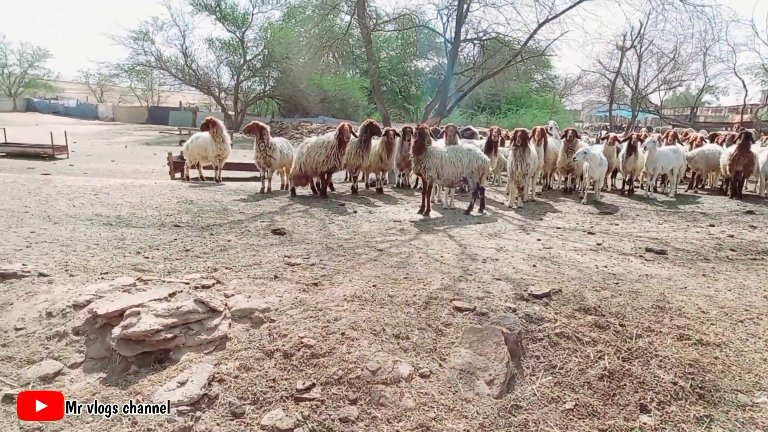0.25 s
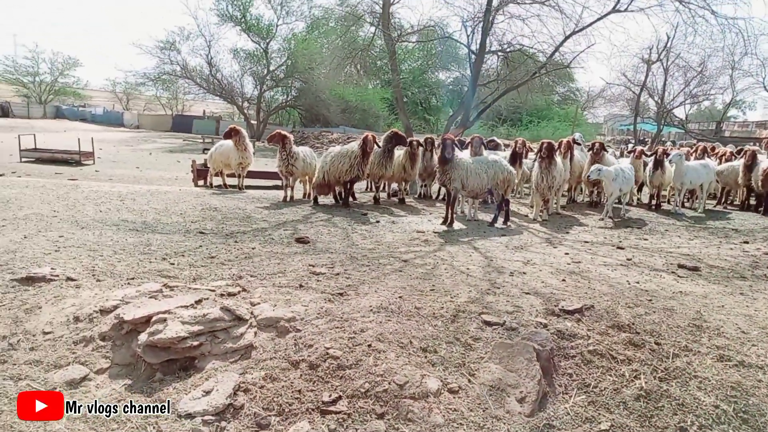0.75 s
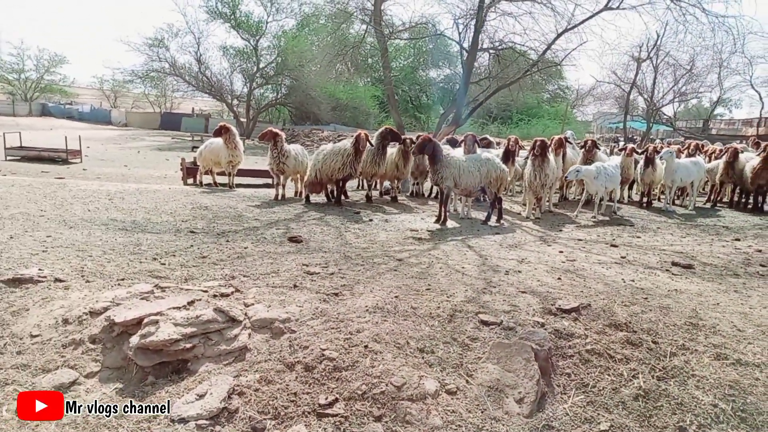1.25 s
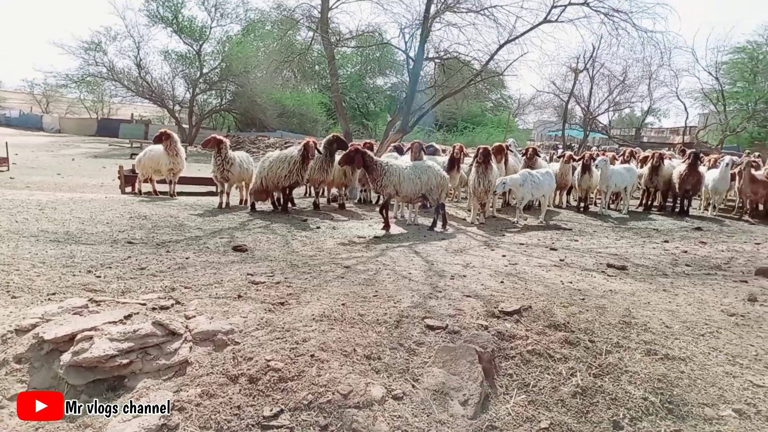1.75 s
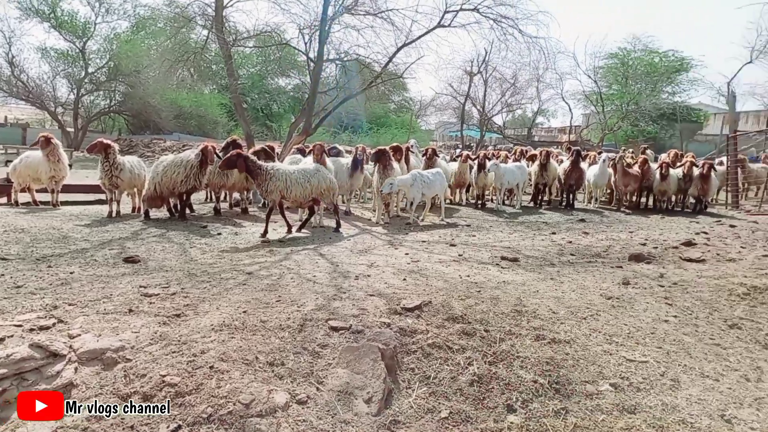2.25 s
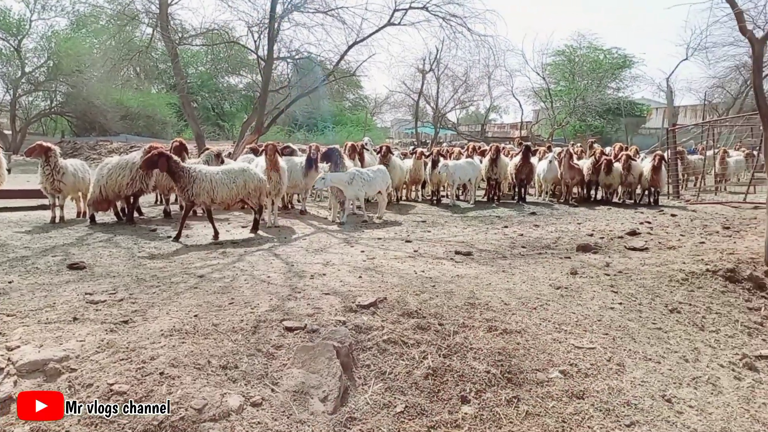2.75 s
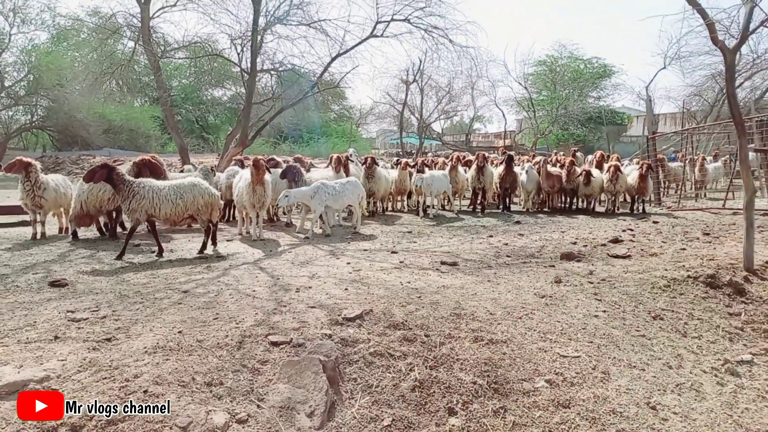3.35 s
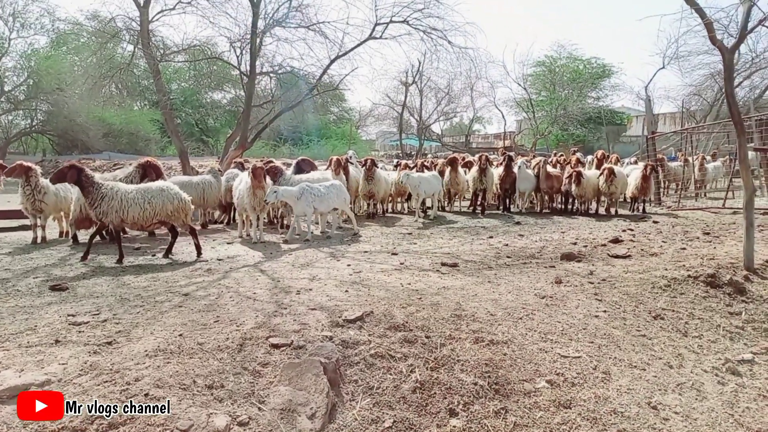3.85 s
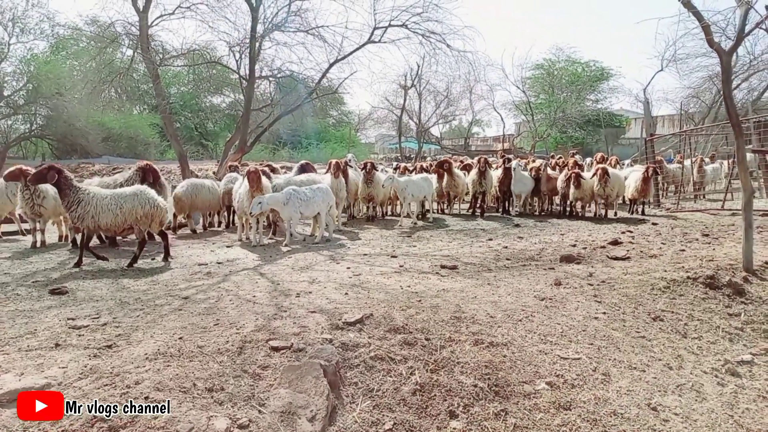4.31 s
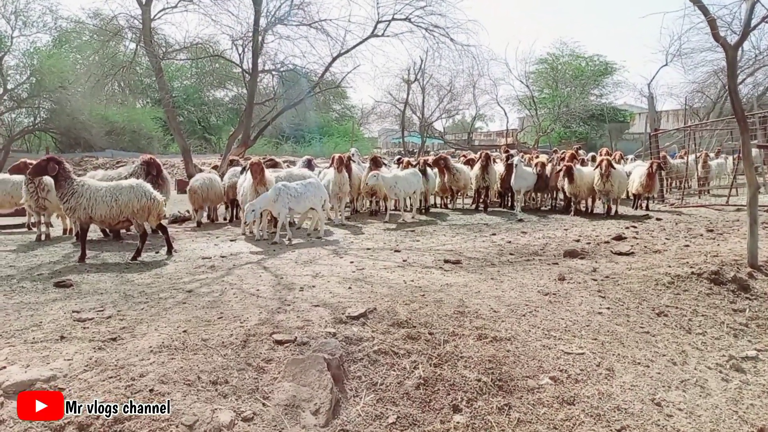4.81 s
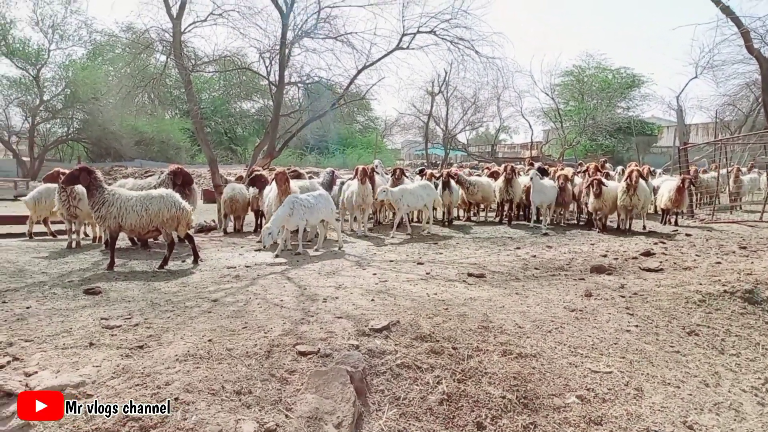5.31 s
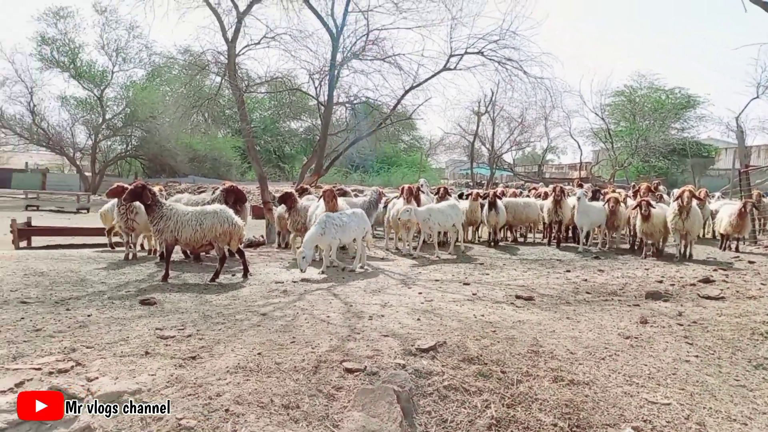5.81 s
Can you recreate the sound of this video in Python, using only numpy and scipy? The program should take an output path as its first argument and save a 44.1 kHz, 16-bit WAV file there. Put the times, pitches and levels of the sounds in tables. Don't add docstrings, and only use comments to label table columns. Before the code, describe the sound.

One sheep bleats, rising then falling hoarse, amid quick sparrow chirps, faint crow caws, low flock murmurs, distant engine throb and handling bumps.

```python
import sys
import numpy as np
from scipy import signal
from scipy.fft import rfft, irfft, next_fast_len
from scipy.io import wavfile
from scipy.ndimage import uniform_filter1d, map_coordinates

SR = 44100
rng = np.random.default_rng(int(sys.argv[2]) if len(sys.argv) > 2 else 0)


def store_pcm(level_fs):
    pcm = np.round(np.clip(level_fs, -1, 1) * 32767).astype(np.int16)
    wavfile.write(sys.argv[1], SR, np.atleast_2d(pcm).T)


def voltage_ratio(decibels):
    exponent = np.asarray(decibels, float) / 20
    return 10 ** exponent


N = 267747


def unit(x):
    return x / np.sqrt(np.mean(x ** 2) + 1e-20)


def along(points, hz, axis=1):
    columns = np.transpose(points)
    return np.interp(np.log(hz + 1), np.log(columns[0] + 1), columns[axis])


def curves(rows):
    s, *columns = np.transpose(rows)
    return [np.interp(np.arange(N) / SR, s, column) for column in columns]


def wobble(rate, size=N):
    knots = rng.standard_normal(int(size * rate / SR) + 4)
    return map_coordinates(knots, [np.arange(size) * rate / SR])


def bump(middle, half):
    return np.exp(-((np.arange(N) / SR - middle) / half) ** 2)


def bouts(rows, quiet_db):
    return voltage_ratio(quiet_db) + sum(voltage_ratio(db) * bump(s, half) for s, half, db in rows)


def filtered(x, response):
    m = next_fast_len(N + SR // 2)
    return irfft(rfft(x, m) * response(np.fft.rfftfreq(m, 1 / SR)), m)[..., :N]


def ring(hz, centre_hz, width_hz):
    return 1j * hz * width_hz / (centre_hz ** 2 - hz ** 2 + 1j * hz * width_hz)


def sides(db):
    pair = np.array([voltage_ratio(db / 2), voltage_ratio(-db / 2)])
    return pair / np.sqrt(np.mean(pair ** 2, axis=0))


def rush(spectrum, patchy_db, size=8):
    # (frequency [Hz], likeness [0-1])
    alike = [(60, .82), (290, .75), (640, .55), (1400, 0)]
    z = signal.stft(rng.standard_normal((2, N)), nperseg=512)[2]
    patches = rng.standard_normal(z.shape[1:])
    for axis in (0, 1):
        patches = uniform_filter1d(patches, size, axis=axis)
    pair = signal.istft(z * voltage_ratio(patchy_db * unit(patches)), nperseg=512)[1][:, :N]

    def shape(hz):
        inside = (hz > spectrum[0][0]) & (hz < spectrum[-1][0])
        turn = np.arccos(np.clip(along(alike, hz), -1, 1)) / 2
        return inside * voltage_ratio(along(spectrum, hz)) * [np.cos(turn), np.sin(turn)]

    mid, side = filtered(pair, shape)
    return unit(np.array([mid + side, mid - side]))


def echoes(x, t60, count=SR // 2):
    tail = rng.standard_normal((2, count)) * voltage_ratio(-60 * np.arange(count) / SR / t60)
    return signal.fftconvolve(x[None], tail / np.linalg.norm(tail[0]), axes=1)[:, :N]


def engine(steady=0.78):
    # (time [s], level [dB])
    drone = [(0, -28), (.2, -33.5), (.42, -25), (.6, -29.5), (.85, -29.5), (1.1, -31.5), (1.7, -34),
             (2.15, -38.5), (3.2, -32), (3.75, -35), (4.3, -34), (5.3, -30), (6.07, -39)]
    # (middle [s], half length [s], depth [dB])
    lulls = [(0.328, 0.035, -14), (0.529, 0.085, -14), (0.784, 0.032, -16), (0.988, 0.069, -5.5),
             (1.16, 0.086, -6.5), (1.484, 0.065, -7), (2.194, 0.05, -11.5), (2.908, 0.029, -17),
             (3.346, 0.028, -28), (4.431, 0.043, -15.5), (5.807, 0.026, -16)]
    # (frequency [Hz], level per Hz [dB])
    tone = [(25, -51), (45, -8), (62, -3.5), (75, 5.5), (88, -4), (105, -11.5), (130, -18), (200, -52)]
    hum = rush(tone, patchy_db=5.5)
    beating = np.sqrt(np.abs(uniform_filter1d(np.mean(hum ** 2, axis=0), size=1300)) + 0.11)
    swell_db = curves(drone)[0] + sum(db * bump(s, half) for s, half, db in lulls)
    return voltage_ratio(swell_db) * unit(hum / beating ** steady)


def flock():
    # (time [s], level [dB])
    stir = [(0, -51), (.7, -53.5), (1.5, -57), (2.5, -55.5), (3.4, -54.5), (3.8, -56), (4.9, -55),
            (5.25, -50.5), (5.75, -59), (6.07, -60.5)]
    # (frequency [Hz], level [dB])
    shuffle = [(100, 14.5), (200, 8), (300, 3), (600, -1.5), (1000, -6), (1500, -12.5), (2000, -17.5)]
    # (middle [s], half length [s], level [dB])
    tramping = [(.1, 0.14, -70), (.75, 0.47, -70), (1.9, 0.31, -64), (2.5, 0.39, -62), (3.5, 0.2, -75),
                (4.62, 0.21, -57.5)]
    # (frequency [Hz], level [dB])
    hooves = [(1500, -35), (1900, 8.5), (2250, 11), (2600, 3), (3200, -13)]
    soft = voltage_ratio(curves(stir)[0] + 4.0 + wobble(18)) * sides(-1.6)[:, None] * rush(shuffle, patchy_db=2.5)
    steps = bouts(tramping, quiet_db=-76.5) * voltage_ratio(1.96 * wobble(25))
    return soft + steps * sides(-17.5)[:, None] * rush(hooves, patchy_db=-1.5)


def far_birds():
    # (middle [s], half length [s], level [dB])
    squabbles = [(0, 0.18, -64), (.48, 0.073, -61.5), (.68, 0.12, -63), (1.95, 0.16, -68.5),
                 (2.55, 0.3, -65.5), (3.6, 0.062, -56), (4.0, 0.14, -67), (4.75, 0.24, -71)]
    # (frequency [Hz], level [dB])
    chatter = [(3000, -7.5), (3700, -0.5), (4400, 5), (5200, -0.5), (6000, -25)]
    loudness = bouts(squabbles, quiet_db=-79.5) * voltage_ratio(3 + 2 * wobble(22))
    return loudness * rush(chatter, patchy_db=4, size=5)


def hiss():
    # (frequency [Hz], level [dB])
    floor = [(2500, -6), (6000, -3), (8500, -1), (9300, -8), (12000, -5), (15600, -7)]
    return voltage_ratio(-70.0) * rush(floor, patchy_db=2.5)


def flock_of_birds():
    # (time after the start [ms], pitch [Hz], level [dB])
    steep = [(0, 3700, -14), (5, 4900, -7), (12, 5330, -2), (18, 5100, -2), (27, 3900, -4), (40, 3250, -13),
             (44, 3250, -35), (48, 3250, -7), (57, 3850, -2), (63, 4600, -6), (69, 3600, -5),
             (81, 2600, -4), (88, 3300, -15), (95, 2550, -7), (101, 2500, -24)]
    low = [(0, 3700, -20), (8, 4100, -15), (14, 4550, -6), (22, 4600, -10), (29, 5300, -13), (36, 3550, -3),
           (44, 3450, 0), (57, 3350, -6), (63, 3250, -32), (71, 3330, -12), (76, 3420, 0), (84, 3450, -11),
           (92, 3300, -6), (100, 2850, -10)]
    short = [(0, 4300, -20), (13, 5650, -11), (20, 4800, -4), (30, 4320, 0), (48, 4050, -5),
             (54, 3800, -32), (59, 3800, -2), (76, 4580, -4), (91, 3600, -8), (104, 3700, -22)]
    long = [(0, 4600, -20), (8, 5700, -11), (17, 6250, -9), (20, 5600, -9), (34, 5400, -5), (44, 4900, -10),
            (52, 4300, 0), (62, 4250, -2), (68, 5000, -13), (75, 4200, -3), (86, 4250, 0), (111, 5050, -7),
            (120, 4250, -5), (140, 3700, -13)]
    arch = [(0, 3100, -28), (30, 3450, -14), (46, 3950, 0), (58, 3700, -9), (72, 3200, -18),
            (94, 2650, -10), (104, 2350, -16), (112, 2480, -4), (130, 2480, -4), (140, 2480, -20)]
    peep = [(0, 5600, -6), (14, 5650, 0), (30, 5500, -2), (38, 5000, -10)]
    whip = [(0, 4500, -6), (8, 6300, 0), (16, 9000, -8)]
    hoop = [(0, 4300, -14), (11, 4750, -4), (17, 5450, -15), (21, 5620, -3), (46, 5620, 0), (52, 5000, -14),
            (57, 4600, -6), (68, 4100, -12)]
    rise = [(0, 4100, -8), (14, 4500, -2), (26, 4950, 0), (32, 5000, -8)]
    far = [(0, 5600, -10), (14, 5250, 0), (26, 5100, -3), (40, 3800, -1), (56, 3500, -6), (72, 4100, -2),
           (90, 4900, -1), (112, 3900, -8)]
    drawl = [(0, 5500, -22), (25, 4300, -20), (35, 3800, -3), (54, 3100, -6), (62, 3050, -28),
             (68, 3150, -2), (80, 3550, 0), (87, 4300, -7), (93, 3050, -2), (102, 2950, -2),
             (108, 2300, -9)]
    kink = [(0, 3750, -8), (17, 4450, -2), (30, 4400, 0), (38, 4850, -7)]
    # (start [s], level [dB], left-right [dB], slowness [factor], pitch [factor])
    steep_at = [(.041, -46.5, -22, .97, 1.0), (2.682, -51.5, -19, 1.01, 1.0), (4.968, -52, -22, 1.0, 1.0)]
    low_at = [(3.52, -43, -9.5, 1.02, 1.0), (4.526, -42.5, -18, 1.0, 1.0), (5.326, -67.5, -25, 1.4, 1.0),
              (5.788, -69, -23, 1.3, 1.0)]
    short_at = [(0.553, -46, -2, 0.98, 0.97), (3.795, -48, 17, 0.99, 1.0), (5.987, -47.5, 11, 0.92, 0.99)]
    long_at = [(1.227, -54, 11, 1, 0.99), (1.856, -60.5, -9, 0.95, 1.0), (3.042, -55.5, 7, 1.01, .99),
               (4.482, -50, 4, 1.04, 1.0)]
    arch_at = [(1.706, -45.5, -16, 1.02, 0.97), (4.254, -48, -16, 1.0, 0.99)]
    peep_at = [(.153, -56, -8, .95, 0.95), (.13, -62, -7, .4, 1.04), (.204, -59, 2, 0.38, 0.8),
               (4.86, -71.5, 4, 1.1, 1.0), (5.097, -74, 0, .7, .92), (0.499, -66.5, -7, 2.1, 1.01),
               (.67, -65, -8, 1.4, 0.92), (.727, -56.5, -23, 0.91, 0.4), (1.225, -60.5, 10, 0.41, 1.18),
               (1.335, -50, 10, 0.64, 0.74), (1.63, -60, -6, 0.8, 0.89), (1.857, -75, 8, .5, 1.19),
               (1.8, -60, -13, .5, 0.8), (1.995, -60, -12, 0.92, 0.87), (2.076, -66, -10, 0.47, 0.84),
               (2.08, -61, -7, 0.39, 0.78), (.432, -62, -1, .4, .92), (2.391, -60, -10, 0.28, 0.69),
               (2.793, -60, -10, .8, 0.82), (3.613, -60, 2, 0.8, 0.63), (3.653, -63.5, 7, 0.73, 0.54),
               (4.081, -68, 0, 0.67, 0.68), (5.75, -77, 11, 1.2, 0.95)]
    whip_at = [(.104, -66, -5, .6, .85), (.119, -63, -5, .5, .75), (3.514, -65, -7, 1.0, 1.0),
               (4.52, -68, -10, 1.0, 1.0)]
    hoop_at = [(4.19, -59, 14, .85, .98), (4.8, -58, 4, 1.0, 1.0), (2.776, -60, -15, .45, .72)]
    rise_at = [(.235, -59.5, -2, 0.95, 0.95), (.243, -61, -2, .6, 1.04), (0.446, -58, -10, 1.75, 1.046),
               (1.121, -49, 3, 0.99, 0.93), (1.9, -71, -4, 1.23, 0.87), (1.945, -65, -5, 1.1, 0.93),
               (2.254, -47.5, -5, .95, 1.0), (2.86, -81, 0, 1, 1.1), (2.92, -88, 2, 1.0, 0.75),
               (3.98, -66, -3, 1.4, 0.91), (4.921, -63.5, 0, 0.73, 0.98)]
    far_at = [(2.451, -61.5, -6, 0.99, 1.0)]
    drawl_at = [(2.248, -49, -8, 1.0, 1.0)]
    kink_at = [(1.719, -51, -10, 1.0, 1.0), (4.268, -57, -10, 1.42, 1.0)]
    # (pitch over the first voice [factor], level [dB], change over the call [dB], left lag [ms])
    voices = [(1, -12, -28, -0.3), (1.12, -14, -5, 0.133), (1.1, -20, 6, -0.271), (1, -16.5, -12, -0.18),
              (1.17, -22, 0, -0.17), (1.1, -17.5, 6, 0.304), (1.3, -14, 0, 0.27), (1.11, -14, -3, 0.29),
              (1.1, -12, -6, 0.068), (0.81, -14, 2, -0.24), (1.4, -12, 1, -0.315), (1.1, -25, 0, -0.2)]
    songs = [steep, low, short, long, arch, peep, whip, hoop, rise, far, drawl, kink]
    times = [steep_at, low_at, short_at, long_at, arch_at, peep_at,
             whip_at, hoop_at, rise_at, far_at, drawl_at, kink_at]
    return zip(songs, times, voices)


def chirp(song, slow, pitch, warble, voice, fade=.003):
    ms, hz, shape_db = np.transpose(song)
    second, second_db, fading_db, lag_ms = voice
    at = ms * slow / 1000
    t = np.arange(0, at[-1], 1 / SR)
    glide = uniform_filter1d(np.interp(t, at, hz), size=160, mode="nearest")
    glide = pitch * warble[:len(t)] * glide
    speed = np.abs(np.gradient(glide)) * SR / 160000.0
    edges = np.clip(np.minimum(t, at[-1] - t) / fade, 0, 1)
    edges = edges * voltage_ratio(-0.5 * np.clip(speed, 0, 2))
    turns = np.cumsum(glide) / SR - glide * np.array([[lag_ms / 1000], [0]])
    whistle = np.sin(2 * np.pi * turns)
    whistle = whistle + voltage_ratio(second_db + fading_db * t / at[-1]) * np.sin(2 * np.pi * second * turns)
    return voltage_ratio(np.interp(t, at, shape_db) + 9.0) * edges * whistle


def sparrows():
    near = np.zeros((2, N + SR))
    warble = np.pad(1 + .016 * wobble(140), (0, SR), mode="edge")
    for song, chirps, voice in flock_of_birds():
        for s, db, pan_db, slow, pitch in chirps:
            start = round(s * SR)
            call = chirp(song, slow, pitch, warble[start:], voice)
            near[:, start:start + call.shape[1]] += sides(pan_db)[:, None] * voltage_ratio(db) * call
    near = near[:, :N] * voltage_ratio(2.3 * wobble(110) + 1.5 * np.array([wobble(300), wobble(300)]) - 1)
    breath = np.array([wobble(3580), wobble(3580)])
    near = near * (1 + voltage_ratio(-16.5) * breath)
    near[:, 1100:] += voltage_ratio(-17) * near[::-1, :-1100]
    branches = echoes(near.sum(axis=0) / np.sqrt(2) * wobble(300), t60=0.045)
    near += voltage_ratio(-6.5) * branches
    trees = echoes(near.sum(axis=0) / np.sqrt(2) * wobble(900), t60=0.3)
    return near + voltage_ratio(-8.5) * trees


def finger_bumps():
    # (time [s], peak [dB], left-right [dB], ring [Hz])
    bumps = [
        (0.074, -12.5, -38, 113.7),
        (0.38, -20.5, -32, 105.5),
        (0.392, -18, -17, 84),
        (1.066, -22.5, -13, 85),
        (2.599, -24, -39, 103),
        (2.943, -27.5, -29, 90),
        (4.847, -28, -9, 87),
        (5.197, -25.5, 4, 91),
    ]
    out, t = np.zeros((2, N + SR)), np.arange(SR // 10) / SR
    for s, db, pan_db, hz in bumps:
        onset = 1 - np.exp(-t / 0.0012)
        turns = hz * (t + 0.0043 * onset)
        thud = voltage_ratio(db - 20.0 * (t / 0.03) ** 2) * onset * np.sin(2 * np.pi * turns)
        start = round(s * SR)
        out[:, start:start + len(t)] -= sides(pan_db)[:, None] * thud
    return out[:, :N]


def finger_ticks():
    # (time [s], peak [dB], left-right [dB], knock [dB])
    ticks = [(0.0756, -41.5, -33, -4), (.243, -56, 0, -18), (0.2805, -51, -2.5, -18), (.346, -68, -3, -18),
             (.381, -53, -10, -8), (1.075, -43, -22, 6), (2.184, -36.5, 4, -47), (2.6594, -35, -15, 9.5),
             (2.685, -35.5, 19, -9), (2.735, -51, -15, 17), (2.751, -51, -16, 14), (3.465, -53, 2, -18)]
    out, t = np.zeros((2, N + SR)), np.arange(SR // 10) / SR
    for s, db, pan_db, knock_db in ticks:
        snap = signal.lfilter([1, 0, -.8], 1, rng.standard_normal((2, len(t))))
        snap = snap * voltage_ratio(-6.0 - 60 * t / 0.028)
        knock = np.sin(2 * np.pi * 2300 * t) + 0.57 * np.sin(2 * np.pi * 3800 * t)
        knock = knock * voltage_ratio(knock_db - 2.0 - 60 * t / 0.013)
        start = round(s * SR)
        out[:, start:start + len(t)] += sides(pan_db)[:, None] * voltage_ratio(db - 3.0) * (snap + knock)
    return out[:, :N]


def far_calls():
    # (middle [s], resonance [Hz], level [dB], left-right [dB])
    caws = [
        (.685, 1446, -55, -6),
        (3.669, 1503, -51, -1.5),
        (5.34, 1460, -53.5, 3),
    ]
    # (middle [s], half length
    # [s], resonance [Hz], level [dB], left-right [dB])
    lows = [(.264, 0.26, 416, -52, -2), (0.276, 0.22, 750, -52.5, -10), (1.094, 0.04, 552, -50.5, -3),
            (2.066, 0.096, 980, -56.5, -7), (2.262, 0.44, 552, -57, -2.5), (3.42, 0.28, 1013, -59.5, -16),
            (4.093, 0.25, 750, -57, -6), (4.636, 0.27, 1560, -60, -16), (5.343, 0.14, 627, -52, -5.5),
            (5.166, 0.15, 1110, -69, -14), (5.396, 0.2, 1190, -53.5, -12), (5.526, 0.13, 1850, -65.5, -10),
            (5.653, 0.11, 617, -59.5, -2)]
    t = np.arange(N) / SR
    pulses = 1 + .25 * np.cos(2 * np.pi * np.cumsum(75 + 20 * wobble(20)) / SR)
    rasp = rng.standard_normal((2, N)) * pulses ** 2
    calls = [(s, 0.073, hz, db, pan_db, 0.17) for s, hz, db, pan_db in caws]
    calls += [(*row, 0.24) for row in lows]
    out = np.zeros((2, N))
    for s, half, hz, db, pan_db, wide in calls:
        throat = unit(filtered(rasp, lambda f: ring(f, hz, wide * hz) ** 2))
        out += sides(pan_db)[:, None] * voltage_ratio(db) * bump(s, half) * throat
    return out


def mouth_gain_db(hz, order, t, mouth_db, hoarse):
    # (frequency [Hz], width [Hz], level [dB])
    cavities = [(3180, 430, -4), (3850, 150, -1), (4380, 130, -5), (4720, 140, 5.5), (5900, 620, 9.5)]
    gain = np.clip(np.log2(hz / 1900), 0, 1.5) * mouth_db
    gain = gain + sum(db * np.exp(-((hz - c) / w) ** 2) for c, w, db in cavities)
    slack = -40 * np.clip(np.log2(hz / 4200), 0, 1)
    pinch = -42 * np.exp(-((hz - 3320) / 300) ** 2)
    gain = gain + hoarse * (slack + pinch)
    closing_s = 1.61
    favoured = 2 * np.exp(-((hz - 2720) / 180) ** 2) - 1.06 * np.clip(hz / 600 - 2.05, 0, 1)
    gain += 3.5 * np.clip((t - closing_s) / 0.26, 0, 1) * favoured
    gain -= 27 * np.clip(t - closing_s, 0, 1) * np.isin(order, test_elements=(3, 5, 6, 7))
    return gain


def sheep(count=25):
    # (time [s], pitch [Hz], effort [dB], mouth opening [dB], hoarseness [0-1])
    bleat = [
        (.98, 215.8, -66, 6.5, 0.13),
        (1.1, 280.8, -56, 7, 0.11),
        (1.16, 308.9, -52, 4, 0.11),
        (1.25, 314.8, -50, 3, 0.1),
        (1.5, 315, -51, 2, 0.03),
        (1.68, 303.6, -51.5, -3, 0.17),
        (1.81, 284.3, -53.5, -10, 0.22),
        (1.97, 271.2, -56.5, -9.5, 0.21),
        (2.06, 251.5, -65, -24, 0.33),
    ]
    # (frequency [Hz], level [dB])
    throat = [(630, -22.5), (820, -15), (940, -9), (1100, -3.5), (1260, -1), (1420, -15), (1900, -21),
              (2200, -12), (2510, 0), (2830, 1.5), (3140, -10.5), (3480, -2.5), (4400, -18.5), (7200, -41)]
    # (frequency [Hz], left-right [dB], left lag [radians])
    shade = [(630, -3, 1), (940, 0, 1.6), (1260, -16, 2), (1570, -4, .6), (2510, -2, 1.7), (2830, -1, 4.1),
             (4090, -2, 4.6)]
    t = np.arange(N) / SR
    begin_s, end_s = bleat[0][0], bleat[-1][0]
    on = slice(round(begin_s * SR), round(end_s * SR))
    pitch, effort_db, mouth_db, hoarse = curves(bleat)
    pitch = uniform_filter1d(pitch, size=2600)
    turns = np.cumsum(pitch * (1 + 0.0006 * wobble(28) + 0.012 * hoarse * wobble(22))) / SR

    order = np.arange(1, count)[:, None]
    hz = order * pitch[on]
    tired = np.clip(hoarse[on], 0, .25)
    flutter = np.array([wobble(30, size=hz.shape[1]) for _ in order])
    drift_db = (1.9 + 11 * tired) * np.clip(hz / 3000, .5, 1) * flutter
    level_db = along(throat, hz) + mouth_gain_db(hz, order, t[on], mouth_db[on], tired) + drift_db
    waves = np.cos(2 * np.pi * (order * turns[on] + rng.random(order.shape)))
    voice = np.zeros(N)
    voice[on] = np.sum(voltage_ratio(level_db) * waves, axis=0)

    def rasp(f):
        whistle = 0.3 * np.abs(ring(f, 3800, 500)) ** 2
        return voltage_ratio(along(throat, f)) + whistle + 0.04 * np.abs(ring(f, 5900, 1500)) ** 2

    puffs = rng.standard_normal(N) * (1 + np.cos(2 * np.pi * turns)) ** 2
    air = np.clip(hoarse, 0, 1) * voltage_ratio(mouth_db) * unit(filtered(puffs, rasp))
    voice[on] += 4 * air[on]
    voice *= voltage_ratio(effort_db + 8.5) * np.clip((t - begin_s) / .07, 0, 1)

    def at_ports(f):
        late = np.exp(-1j * along(shade, f, axis=2) * np.array([[1], [0]]))
        return sides(along(shade, f)) * late

    return filtered(voice, at_ports) + voltage_ratio(-10) * echoes(voice, t60=0.43)


def skin_rub():
    # (start [s], end [s], level [dB])
    strokes = [
        (2.21, 2.74, -63),
        (2.964, 3.066, -65.5),
        (3.495, 3.54, -67),
        (4.494, 4.545, -69),
        (5.46, 5.58, -66.5),
    ]
    # (frequency [Hz], level [dB])
    skin = [(3000, 1.5), (6000, 4), (9000, 1.5), (11500, 2.5), (15600, -2)]
    t = np.arange(N) / SR
    press = np.zeros(N)
    for a, b, db in strokes:
        grip_db = 600 * np.clip(a - t, 0, None)
        slip_db = 174 * np.clip(t - b, 0, None)
        press += voltage_ratio(db - grip_db - slip_db)
    return press * voltage_ratio(1.5 * wobble(40) + wobble(7)) * rush(skin, patchy_db=1.5)


def scene():
    background = engine() + flock() + far_birds() + hiss()
    animals = sparrows() + far_calls() + sheep()
    handling = finger_bumps() + finger_ticks() + skin_rub()
    return background + animals + handling


def top_cut(x):
    return signal.sosfilt(signal.butter(12, 15710, fs=SR, output="sos"), x)


def record(dry):
    top_hz = 15650
    mix = filtered(dry, lambda hz: hz < top_hz)
    return top_cut(mix)


dry = scene()
out = record(dry)
store_pcm(out)
```